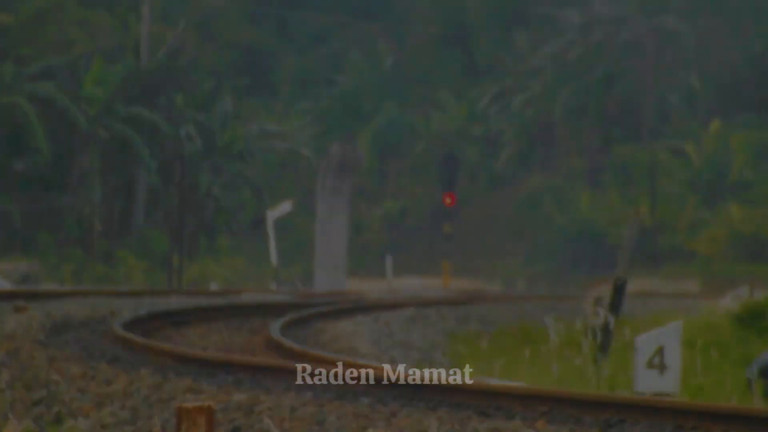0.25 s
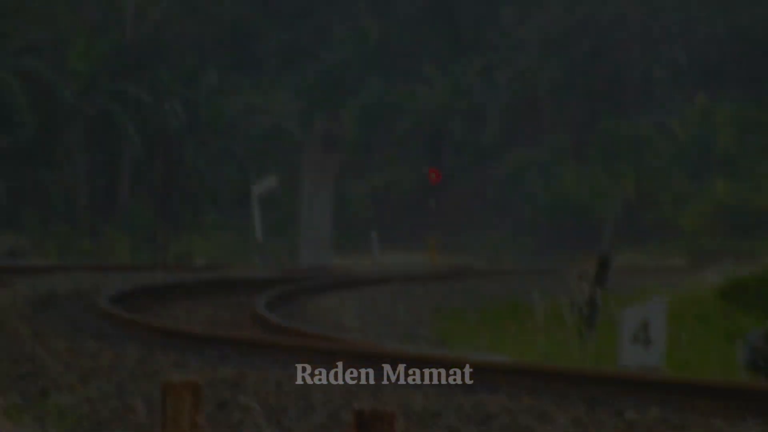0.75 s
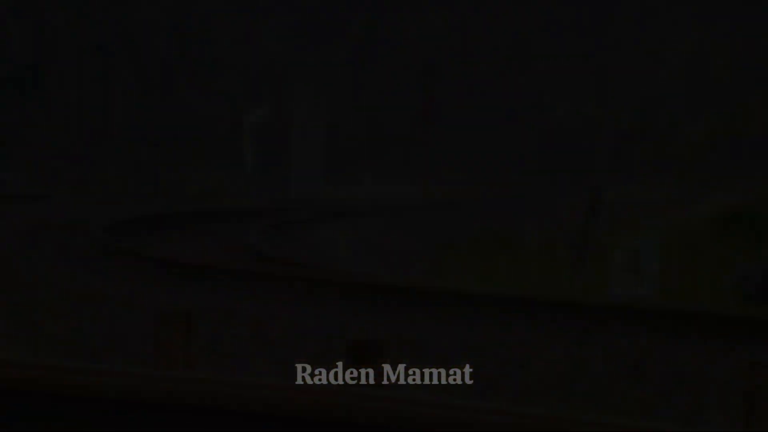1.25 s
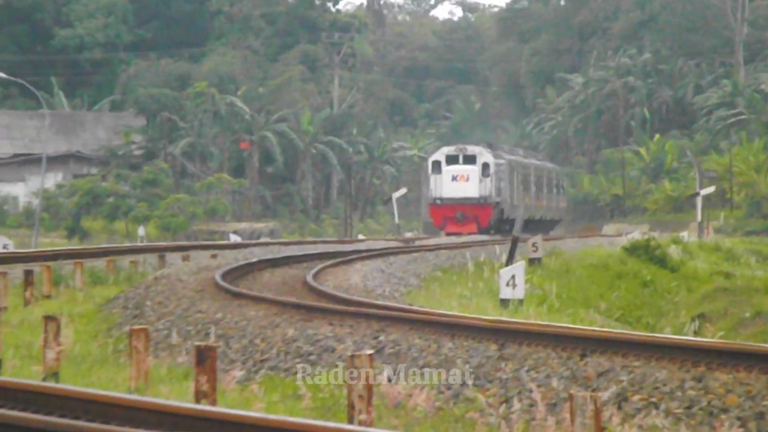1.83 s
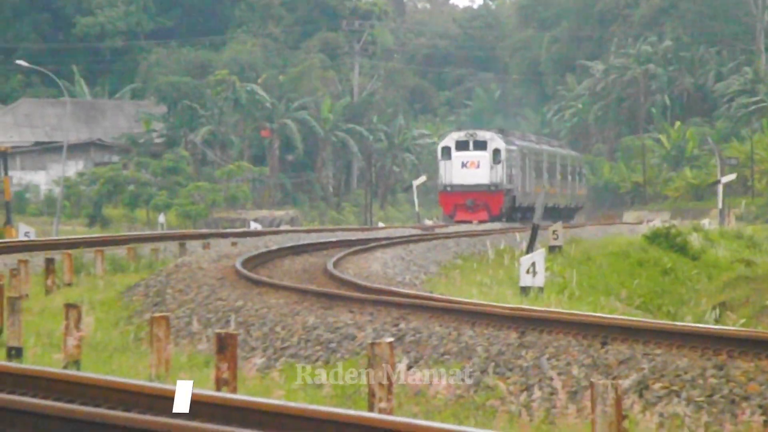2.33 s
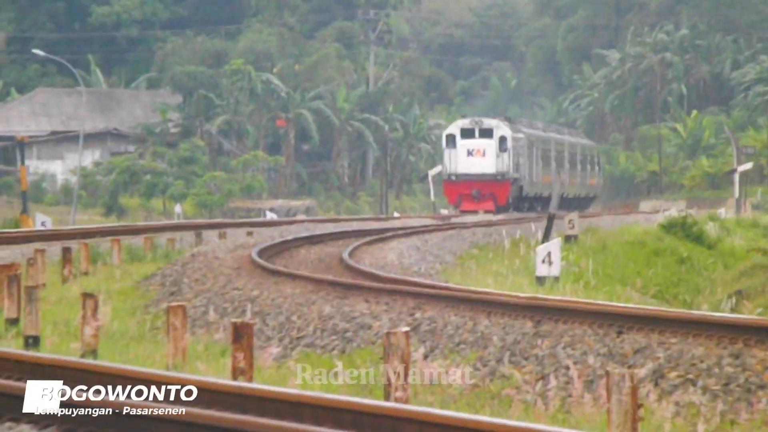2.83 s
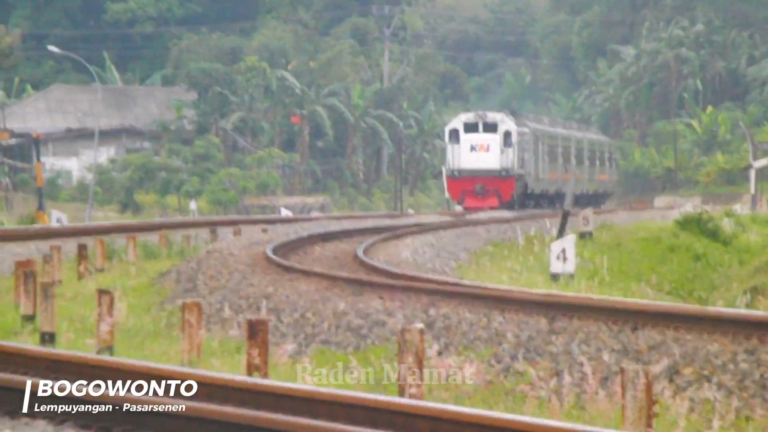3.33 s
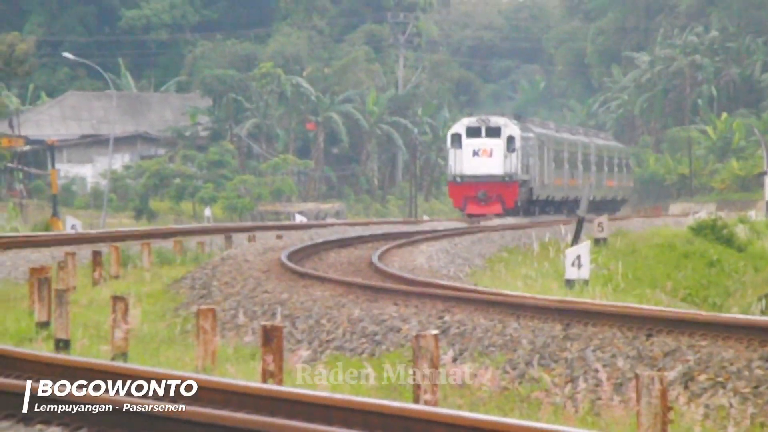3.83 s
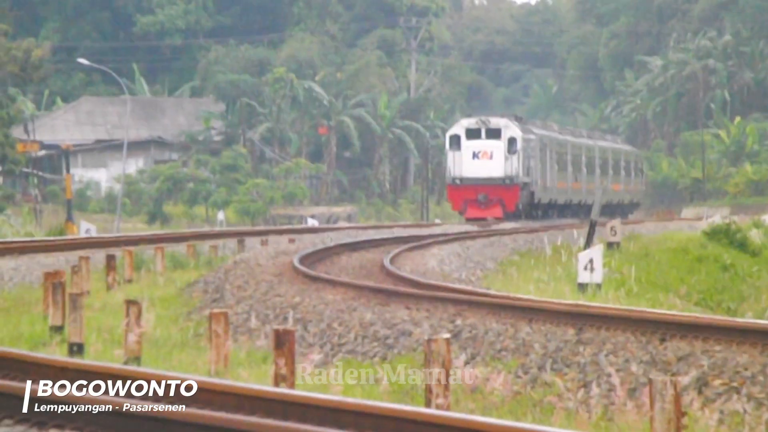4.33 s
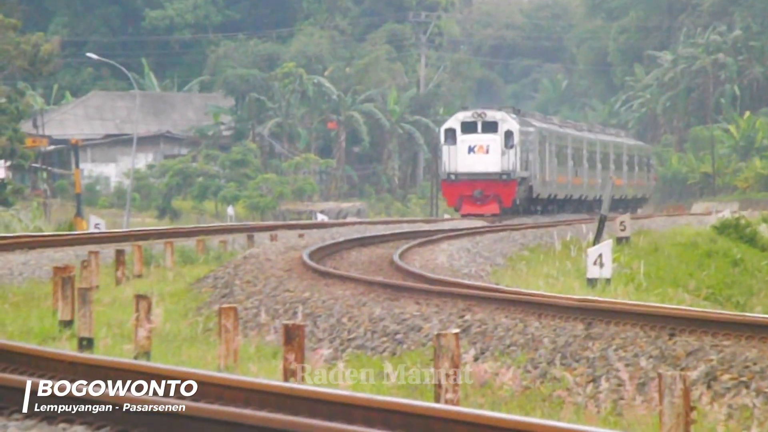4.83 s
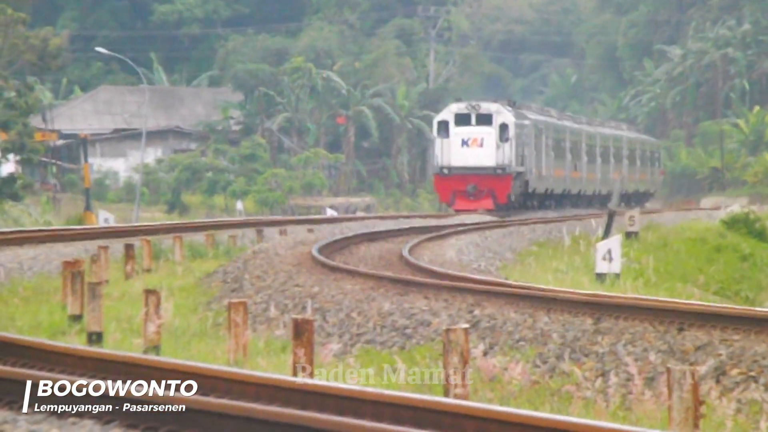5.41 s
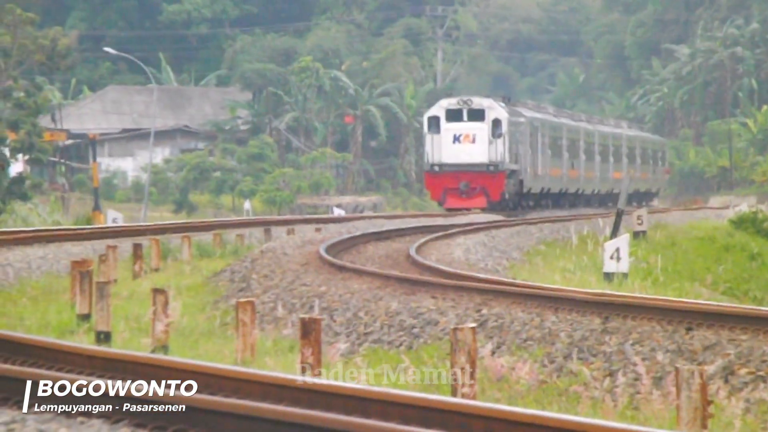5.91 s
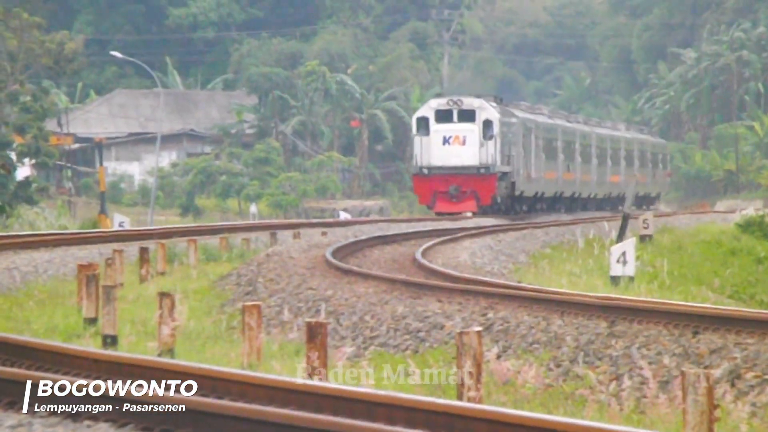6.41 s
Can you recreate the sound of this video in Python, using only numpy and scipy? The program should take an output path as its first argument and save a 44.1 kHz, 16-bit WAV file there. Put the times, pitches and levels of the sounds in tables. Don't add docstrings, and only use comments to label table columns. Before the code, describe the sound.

Shrill cicadas drone by a rural track, handheld camera ticks click sharply, then a cut to quieter insects that swell over a faint approaching diesel rumble.

```python
import sys
import numpy as np
from scipy import signal
from scipy.fft import rfft, irfft
from scipy.io import wavfile
from scipy.ndimage import uniform_filter1d, map_coordinates

SR = 44100
rng = np.random.default_rng(int(sys.argv[2]) if len(sys.argv) > 2 else 0)


def linear_from_db(decibels):
    return 10 ** (np.asarray(decibels, float) / 20)


def dump_mix(stems):
    frames = np.atleast_2d(stems).T
    limited = np.clip(frames, -1, 1)
    pcm = np.round(limited * 32767).astype(np.int16)
    wavfile.write(sys.argv[1], SR, pcm)


N = 293706
T = np.arange(N) / SR
CUT_S = 1.486

# start_s [s], level_db [dB]
CHORUS_EFFORT = [
    [(0, -26.5), (1.48, -25)],
    [(1.63, -36.5), (2.6, -35.5), (3.2, -34), (3.7, -28.5), (4.3, -26), (5.0, -24.5), (5.5, -23.5),
     (6.0, -22), (6.66, -22)],
]
VOICES_BEFORE_DB = [-5.5, -2.5, -6.0]
VOICES_AFTER_DB = [-5, -3.5, -6.5]
# frequency_hz [Hz], level_db [dB per Hz]
WASH_BEFORE = [(25, -29), (64, -21), (118, -21.5), (250, -8.5), (450, -4.5), (900, -5), (2700, -9.5),
               (3700, -13), (4300, -5), (4600, -14), (5300, -40)]
# frequency_hz [Hz], level_db [dB per Hz]
WASH_AFTER = [(68, -46), (115, -35), (129, -15), (620, 0), (3120, -6.5), (3300, -9.5), (4290, -9),
              (7260, -120)]
# pitch_hz [Hz], width_hz [Hz], level_db [dB]
EXHAUST_PIPE = [(76, 18, -1), (94, 22, 1)]
# frequency_hz [Hz], level_db [dB per Hz]
HISS_SPECTRUM = [(20, -30), (200, -12.5), (2500, -6.5), (3800, 0), (4450, 0.5), (5300, -1.5), (5700, -1.5),
                 (6200, -3), (10000, -3), (15500, -3), (17000, -29)]
# start_s [s], peak_db [dB], driven_hz [Hz], the pitch each excites best
TICKS = [(0.7197, 1.5, 1850), (0.7209, -7, 3100), (0.7215, -7.5, 4500), (.7219, -9, 8500),
         (0.7223, -7, 4900), (0.7237, -14, 2200), (0.8754, -12, 2250), (0.877, -18, 2500),
         (1.173, -22, 4200), (1.4011, -7, 2800), (1.4016, -3, 3500), (1.4026, -2, 4500),
         (1.4046, -12, 4400)]
# pitch_hz [Hz], level_db [dB], t60_s [s]
CAMERA_BODY = [(840, -8, .008), (1370, -16, 0.0089), (2113, -1, .012), (2700, -7, 0.0095),
               (3180, -3.5, 0.01), (3920, -3.5, 0.0092), (4660, 0, 0.0091), (5600, -3, 0.010),
               (7240, -10, 0.0055), (9000, -12, .005)]
# start_s [s], length_s [s], from_hz [Hz], to_hz [Hz], level_db [dB]
BIRD_NOTES = [
    (3.71, 0.077, 4350, 3800, -47),
    (4.06, .08, 2350, 2330, -55),
]
# start_s [s], pitch_hz [Hz]
LATE_STEPS = [
    (5.3, 5245),
    (5.98, 5160),
    (6.43, 5105),
]


def in_time(rows):
    s, *columns = np.transpose(rows)
    return [np.interp(T, s, c) for c in columns]


def cut(before, after):
    return np.where(T < CUT_S, before, after)


def bump(at_s, width_s):
    return np.exp(-.5 * ((T - at_s) / width_s) ** 2)


def rms_one(x):
    return x / np.sqrt(np.mean(np.abs(x) ** 2))


def drift(per_s):
    knots = rng.standard_normal(400)
    return map_coordinates(knots, [T * per_s % 399], order=3)


def coloured(spectrum, patchy_db):
    hz = np.maximum(np.arange(N // 2 + 1) * SR / N, 1)
    point_hz, point_db = np.transpose(spectrum)
    colour_db = np.interp(np.log(hz), np.log(point_hz), point_db)
    tone = rfft(rng.standard_normal(N)) * linear_from_db(colour_db)
    out = np.zeros(N)
    for centre_hz in 32 * 2 ** np.arange(10):
        octave = np.clip(1 - np.abs(np.log2(hz / centre_hz)), 0, 1)
        out += irfft(tone * octave, N) * linear_from_db(patchy_db * drift(7))
    return rms_one(out)


def resonance(x, hz, width_hz):
    r = np.exp(-np.pi * width_hz / SR)
    ring = [1, -2 * r * np.cos(2 * np.pi * hz / SR), r * r]
    return signal.lfilter(np.array([1, 0, -1]) * (1 - r * r) / 2, ring, x)


def pulses(per_s, jitter, rough):
    cycle = np.floor(np.cumsum(per_s * (1 + jitter * drift(9))) / SR + rng.random())
    strength, phase = rng.standard_normal((2, N))
    fired = np.diff(cycle, prepend=cycle[0]) > 0
    out = np.zeros(N, complex)
    out[fired] = linear_from_db(2.7 * rough * strength[fired]) * np.exp(2j * rough * phase[fired])
    return out


def cicadas(pitch_hz, level_db, per_s, pulse_ms, rough, echo_db, throb_db, count):
    clicks = np.zeros(N, complex)
    for k in np.arange(count) - count // 2:
        detune = np.exp(2j * np.pi * 17 * k * T)
        clicks += pulses(per_s * (1 + .06 * k), .02, rough) * detune
    burst_ms = np.arange(-2400, 2400) / SR * 1000
    burst = np.exp(-.5 * (burst_ms / pulse_ms) ** 2)
    scatter = rng.standard_normal(4000) * linear_from_db(echo_db - 18.5 - 60 * np.arange(4000) / SR / 0.24)
    scatter[0] = 1
    shape = rms_one(signal.fftconvolve(clicks, np.convolve(burst, scatter))[2400:N + 2400])
    carrier = np.exp(2j * np.pi * np.cumsum(pitch_hz) / SR)
    tone = np.sqrt(2) * np.real(shape * carrier)
    return tone * linear_from_db(level_db + throb_db * drift(14))


def chorus():
    swell_s, rise_s, lift_hz, sag_hz_per_s = 3.45, .35, 38, 20
    pinch_hz, spread_hz = 20, 14
    outer_lead_db = 3.5
    effort_db = cut(*in_time(CHORUS_EFFORT[0]), *in_time(CHORUS_EFFORT[1]))
    lead = bump(4.6, .45)
    since_swell = T - swell_s
    fresh_hz = lift_hz * np.clip(1 + since_swell / rise_s, 0, 1)
    tired_hz = sag_hz_per_s * np.maximum(since_swell, 0)
    middle_hz = cut(4845, 4800 + fresh_hz - tired_hz)
    spacing_hz = cut(118, 90 - pinch_hz * bump(swell_s, rise_s / 2) + spread_hz * lead)
    low_db, middle_db, top_db = (
        effort_db + cut(before, after) + sign * outer_lead_db * lead
        for before, after, sign in zip(VOICES_BEFORE_DB, VOICES_AFTER_DB, [1, -1, 1]))
    out = cicadas(middle_hz - spacing_hz, low_db, 58, 3.1, .7, -11, .4, count=4)
    out += cicadas(middle_hz, middle_db, 36, 6.0, .3, -8, .4, count=3)
    return out + cicadas(middle_hz + spacing_hz, top_db, 63, 3.1, .7, -13, .4, count=4)


def low_singers():
    level_db = cut(-47, -45.5 + .34 * (T - CUT_S))
    return cicadas(cut(3470, 3520), level_db, 54, 1.5, .6, -6, .8, count=2)


def side_singers():
    return cicadas(4565 - 55 * T, -36 - 5 * T, 45, 1.4, .7, -4, .6, count=4) * (T < CUT_S)


def wash():
    level_db = cut(-37.5, -40 + .15 * (T - CUT_S))
    return linear_from_db(level_db) * cut(coloured(WASH_BEFORE, 0.87), coloured(WASH_AFTER, 0.38))


def approach():
    distance_m, speed_m_s = 140, 14.5
    surge_db, surge_per_s, surge_peak_s = 1, 1.16, 4.5
    nearer = distance_m / (distance_m - speed_m_s * (T - CUT_S))
    surge = surge_db * np.cos(2 * np.pi * surge_per_s * (T - surge_peak_s))
    return cut(-74, -65.5 + 20 * np.log10(nearer) + surge)


def diesel(engine_db):
    firing_hz = 19.0
    drive = rms_one(np.real(pulses(firing_hz, .05, .5))) + 1.7 * rng.standard_normal(N)
    pipe = np.zeros(N)
    for hz, width_hz, db in EXHAUST_PIPE:
        narrow = resonance(drive, hz, width_hz)
        pipe += linear_from_db(db) * resonance(narrow, hz, 2 * width_hz)
    return linear_from_db(engine_db) * rms_one(pipe)


def hiss():
    return linear_from_db(-31.5 - 3.5) * coloured(HISS_SPECTRUM, 0.28)


def camera():
    s, peak_db, driven_hz = np.transpose(TICKS)
    chance = rng.standard_normal((len(s), len(CAMERA_BODY)))
    out = np.zeros(N)
    for k, ((hz, db, t60), luck) in enumerate(zip(CAMERA_BODY, chance.T)):
        octaves_off = np.log2(hz / driven_hz)
        blow_db = peak_db + db - 2.5 - 16.4 * octaves_off ** 2 + 1.4 * luck
        blow = np.full(N, 1e-18)
        blow[(s * SR).astype(int)] = (-1) ** (k + 1) * linear_from_db(blow_db)
        r, w = linear_from_db(-60 / (t60 * SR)), 2 * np.pi * hz / SR
        out += signal.lfilter([0, np.sin(w)], [1, -2 * r * np.cos(w), r * r], blow)
    return signal.sosfilt(signal.butter(2, [800, 10000], "band", fs=SR, output="sos"), out)


def bird():
    out = np.zeros(N)
    for s, length, from_hz, to_hz, db in BIRD_NOTES:
        u = np.clip((T - s) / length, 0, 1)
        phase = 2 * np.pi * np.cumsum(from_hz + (to_hz - from_hz) * u) / SR
        out += linear_from_db(db + 7.5) * np.sin(np.pi * u) * np.sin(phase)
    return out


def late_singer():
    late_s, attack_s, glide_s = 5.3, .4, .1
    since = T - late_s
    growth_db = 18 * np.maximum(since - attack_s, 0)
    late_db = np.interp(since, [0, attack_s], [-62, -50]) + growth_db
    s, hz = np.transpose(LATE_STEPS)
    step_hz = hz[np.maximum(np.searchsorted(s, T) - 1, 0)]
    late_hz = uniform_filter1d(step_hz, size=int(glide_s * SR))
    out = cicadas(late_hz, np.minimum(late_db, -40.5), 13, 17, .3, -6, 1.5, count=1)
    halo_db = np.minimum(late_db + 4, -41.5)
    out += cicadas(5090 - 40 * since, halo_db, 47, 1.9, .6, -3, 1.2, count=3)
    return out * (since > 0)


def scene():
    field = chorus() + low_singers() + side_singers() + wash() + diesel(approach())
    field += hiss() + camera() + bird() + late_singer()
    return np.array([field, field])


def band_limit(x):
    return signal.sosfilt(signal.butter(12, 15850, fs=SR, output="sos"), x)


def record(dry):
    fade_end_s, fade_from_db = 1.612, -44
    fade_db = np.interp(T, [CUT_S, fade_end_s], [fade_from_db, 0]) * (T >= CUT_S)
    own_hiss = linear_from_db(-60) * np.diff(rng.standard_normal((2, N + 1)))
    lagged = np.array([np.roll(dry[0], 1), dry[1]])
    ports = (lagged + own_hiss) * linear_from_db(fade_db)
    rounded = 1.8 * np.tanh(ports / 1.8)
    top_cut = signal.cheby2(16, 50, 16050, fs=SR, output="sos")
    return band_limit(signal.sosfilt(top_cut, rounded))


dry = scene()
out = record(dry)
dump_mix(out)
```